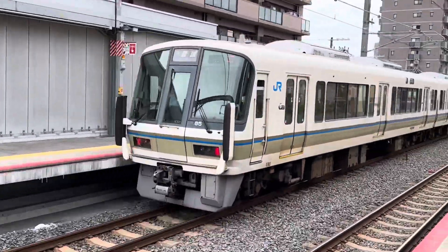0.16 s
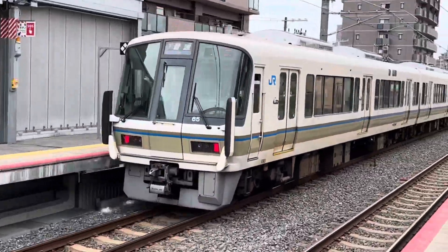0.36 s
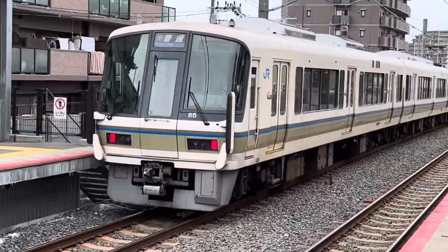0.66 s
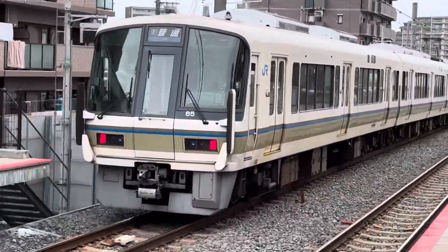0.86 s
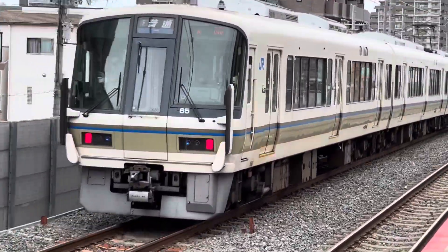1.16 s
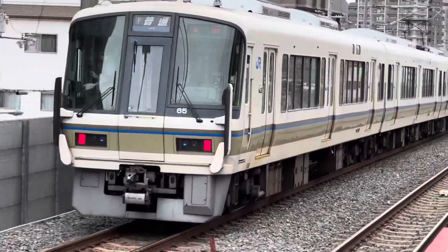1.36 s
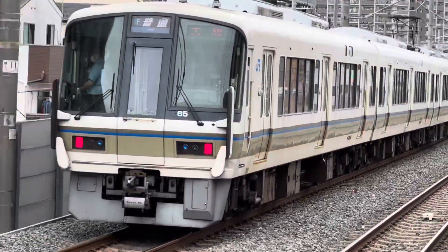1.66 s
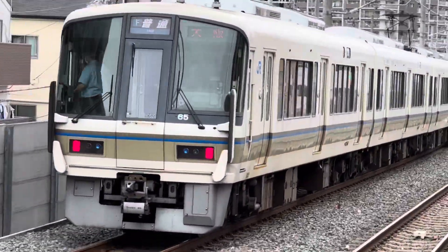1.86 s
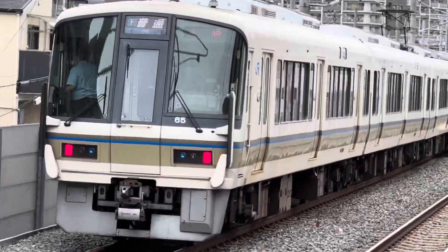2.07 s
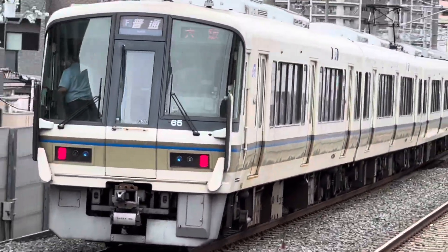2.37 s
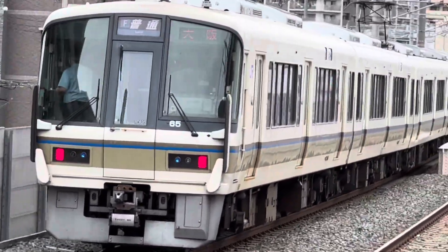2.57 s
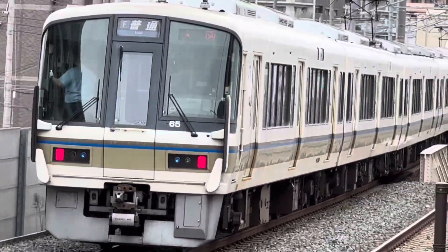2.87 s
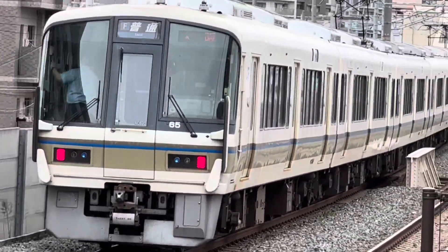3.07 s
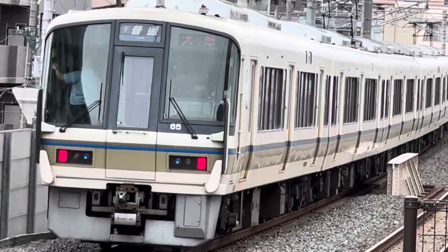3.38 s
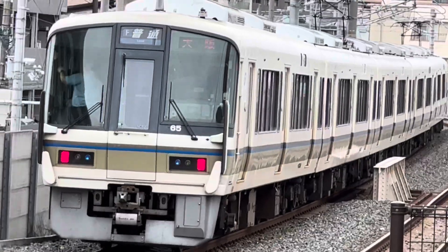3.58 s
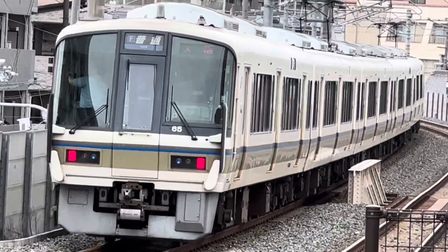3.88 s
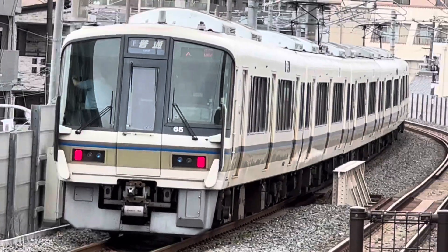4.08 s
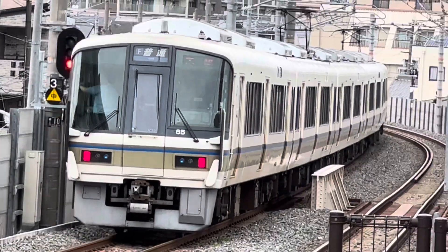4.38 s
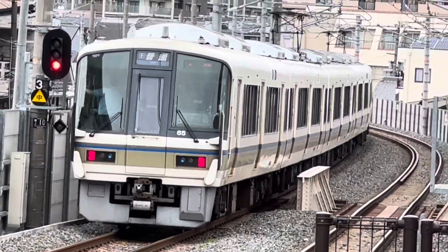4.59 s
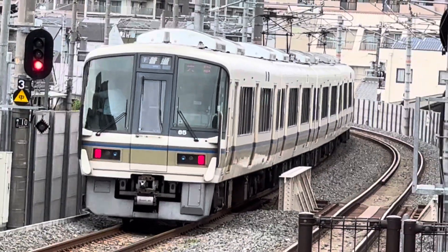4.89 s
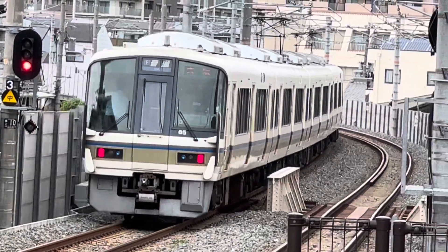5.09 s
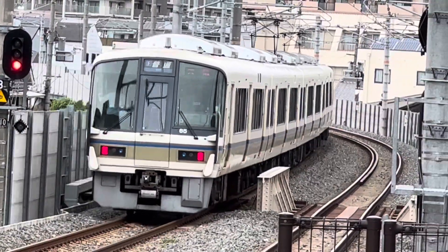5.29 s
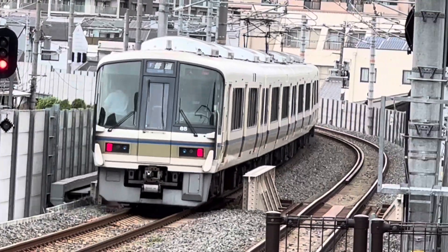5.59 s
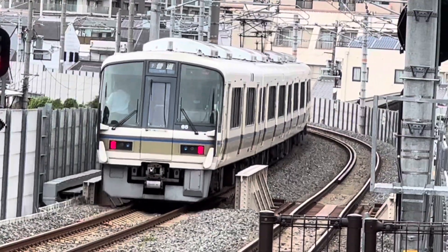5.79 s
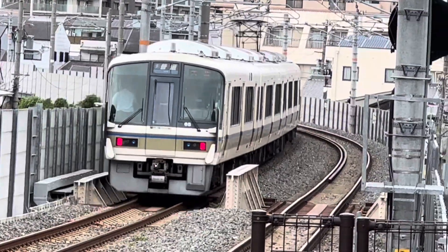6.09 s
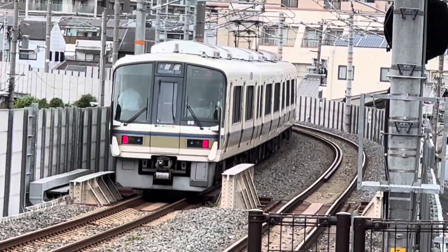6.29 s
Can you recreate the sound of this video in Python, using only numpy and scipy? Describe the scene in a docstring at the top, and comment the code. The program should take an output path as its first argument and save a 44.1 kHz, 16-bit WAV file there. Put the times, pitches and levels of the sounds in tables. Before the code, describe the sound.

Close steel rumble and a low motor whine recede along the track as gusts buffet the microphone, softly at first, harder near the end.

```python
"""From an open platform, a dozen metres off the last car, an electric train is heard gathering speed.
At first wheels squeal, eddies thump the two microphone ports and a motor car drones past the platform end.
A worn wheel throbs once a turn and the drive whines as the roar sinks into its echo off walls and houses.
Then the cars bite into a curve, swelling bands of that echo, while stronger gusts return to the microphone.
Shaped noise makes roar, echo and breeze; narrow noise the squeals; slowing swings the thumps."""
import sys
import numpy as np
from scipy import signal
from scipy.fft import rfft, irfft
from scipy.io import wavfile
from scipy.ndimage import uniform_filter1d

SR = 44100
rng = np.random.default_rng(int(sys.argv[2]) if len(sys.argv) > 2 else 0)


def file_out(sig):
    """Save sig as 16-bit WAV at sys.argv[1]."""
    # one column per channel
    cols = np.atleast_2d(sig).T
    # limit, then scale
    lim = np.clip(cols, -1, 1)
    pcm = np.round(lim * 32767).astype(np.int16)
    wavfile.write(sys.argv[1], SR, pcm)


N = 284445  # samples
SIZE, HOP = 1024, 256  # spectral frame and step, samples
BINS = np.fft.rfftfreq(SIZE, 1 / SR)  # Hz
FRAMES = np.arange(N // HOP + 3) * HOP / SR  # s
TIME = np.arange(N) / SR  # s
SIDES = np.array([[1], [-1]])  # left, right

# Microphone, left port against right: freq_hz, likeness (0 to 1)
PORT_LIKENESS = [(60, .89), (250, .89), (640, .64), (1050, .15), (1400, .52), (1750, .88), (2300, .965),
                 (2900, .91), (4000, .95), (5500, .985), (7700, .9999), (8800, .9999), (9600, .9),
                 (11000, .99), (13000, .95), (15000, .4)]
# Lead of the left port: freq_hz, lead_rad
PORT_LEAD = [(6700, 0), (7350, 1), (7700, 3.13), (8800, 3.15), (9150, 1.5), (10300, 0)]
# Left port minus right: freq_hz, balance_db
PORT_BALANCE = [(700, 0), (1000, 1), (1320, 3), (1900, .6), (2400, 0)]
TREBLE_EDGE_HZ = 15650

# Colour of the breeze's rumble, only the shape counts: freq_hz, density_db
BREEZE_COLOUR = [(25, -13), (48, 7), (66, 6), (100, -8), (135, -9.5), (190, -10), (280, -28.5), (600, -43),
                 (2000, -85)]
# Gusts at the microphone: middle_s, length_s, level_db (before the breeze's trim), pitch_factor
GUSTS_AT_PORTS = [(0.174, 1, -31, 0.99), (.47, 0.44, -32, 1.18), (2.763, 0.44, -35, 1.27),
                  (3.703, 1, -44.5, 0.99), (4.81, 0.27, -37, 1.1), (5.107, 0.28, -34, 1.11),
                  (5.402, 0.55, -31.5, 0.99), (5.684, 0.41, -33, 1.16), (5.922, 0.39, -32.5, 1.03),
                  (6.066, 0.2, -31, 1.1)]
# The breeze between gusts (before the trim), and its quick unevenness (rms dB)
LULL_DB, LULL_PITCH_FACTOR, LUMPY_DB = -58, 0.94, 1.8
# Single eddies striking the ports: middle_s, level_db, pitch_hz (at the middle), length_s,
# wake_db (against level_db)
PORT_EDDIES = [(0.113, -17.5, 98, 0.04, -9), (.152, -19, 149, 0.015, -3), (.181, -20, 113, 0.02, -6),
               (.246, -29, 190, 0.025, -19), (0.31, -21.5, 91, 0.041, -10), (0.41, -21.5, 129, 0.025, -14),
               (0.435, -21.5, 129, 0.033, -6), (0.522, -29, 67, .05, -10), (.612, -20, 108, 0.017, -9),
               (2.456, -15.5, 90, 0.017, -12.5), (2.79, -32, 84, 0.044, -14), (2.838, -26, 68.3, .04, -14),
               (2.878, -27, 78, 0.042, -17), (3.615, -31, 62, 0.049, -23), (3.863, -30, 62.3, 0.055, -15),
               (4.76, -28, 149, .018, -18), (4.83, -30.5, 86, .05, -14), (5.063, -25.5, 61.6, .04, -17),
               (5.275, -19, 81.5, .028, -20), (5.366, -26, 64, .045, -19), (5.42, -29, 170, 0.017, -14),
               (5.465, -27.5, 110, 0.022, -11), (5.495, -28, 57.5, 0.061, -16),
               (5.612, -24.5, 123, 0.028, -18), (5.631, -17, 165, 0.013, -19),
               (5.836, -12.5, 146, 0.022, -11), (6.031, -27.5, 207, 0.018, -3),
               (6.099, -24, 95, 0.018, -13), (6.123, -29, 56, 0.044, -20), (6.183, -27.5, 195, 0.014, -19)]
WAKE_PEAK_S = .028  # from the middle of an eddy to the height of its wake
# Brief faint hisses: middle_s, length_s, centre_hz, width_hz, level_db
TREBLE_HISSES = [(1.762, .006, 12800, 3000, -57), (3.425, .12, 4900, 3000, -55.5),
                 (4.882, 0.49, 3550, 1100, -59), (6.292, 0.036, 10500, 3500, -68),
                 (6.42, .25, 10500, 3000, -72)]

# Wheel speed, its gain each second, the part of a turn already done, and the rim's length
TURNS_PER_S, TURNS_PER_S2, FIRST_TURN, WHEEL_RIM_M = 4.48, .17, .45, 2.7
START_M = 12.2  # distance of the last car at the start
HUM_RECEDE_SHARE = .55  # share of the train's fading that the hum follows; echoes carry the rest
# Pitch of the drive's whine, before it wavers: time_s, pitch_hz
WHINE_PITCH_TRACK = [(.7, 384), (1.3, 393), (2.1, 401), (2.85, 370), (3.3, 374), (4.0, 392), (5.5, 394),
                     (6.4, 402)]
# The whine stands out of the hum: middle_s, length_s, peak_db
WHINE_STANDOUTS = [(0.677, 0.43, -31), (1.28, 0.38, -34), (1.732, 0.15, -36), (1.884, 0.21, -32.5),
                   (2.036, 0.26, -35.5), (2.543, 0.15, -42), (2.834, 0.19, -37), (3.94, .25, -46),
                   (4.247, 0.055, -38), (5.193, 0.19, -42), (5.515, 0.28, -39.5)]
# A wheel sings out briefly: middle_s, length_s, pitch_hz, width_hz, level_db (of the part common to both sides)
WHEEL_SONGS = [(0.016, .1, 650, 45, -34), (0.046, 0.09, 544, 160, -34), (0.154, 0.2, 650, 55.3, -33),
               (0.224, .13, 460, 30.2, -32), (0.317, .2, 723, 25, -38.5), (.07, .2, 1407, 60, -42.5),
               (0.173, .1, 1970, 90, -39), (1.063, .16, 336, 25, -41), (1.474, .12, 1380, 70, -46),
               (1.883, 0.08, 1370, 70, -44), (2.291, .12, 1380, 80, -50), (3.414, 0.1, 1430, 100, -47.5),
               (3.6, 0.11, 1420, 70, -50), (5.846, 0.094, 1390, 70, -47.5), (6.386, .2, 383, 80.6, -41.5)]

# Direct rolling roar, only the shape counts: freq_hz, density_db
ROAR_COLOUR = [(48, -12), (76, 14), (100, -4), (140, 4.5), (310, 2.5), (420, 2), (510, -2), (635, 1),
               (740, -2), (1050, -3), (1250, -13.5), (2400, -15.5), (4400, -26.5), (7000, -26.5),
               (9500, -29.5), (11000, -42.5), (15500, -50)]
# The roar thrown back by walls and houses, only the shape counts: freq_hz, density_db
ECHO_COLOUR = [(40, -1), (64, 4), (105, 3), (170, 3.5), (290, -7.5), (430, -1.5), (590, -5), (780, -2),
               (1150, -11), (1700, -20.5), (3000, -21), (5000, -48.5), (7400, -59), (9300, -37),
               (10800, -68), (12500, -42.5), (15500, -54)]
# Ringing of wheels and rails, about which it flickers: pitch_hz, width_hz, height_db
STEEL_RINGS = [(1412, 125, 7.5), (1520, 180, 1), (1928, 164, 5.5), (2056, 160, 4.5), (2690, 207, 8),
               (3634, 410, 5.5), (4410, 1050, 7)]
# How far each band joins in the throb: freq_hz, swing_factor
THROB_BANDS = [(60, 0.36), (350, 1.65), (900, 1.44), (1400, 0.91), (2200, 0.85), (5000, 0.64),
               (12000, 0.53)]
# Echo bands that swell: middle_s, length_s, rise_db, centre_hz, width_hz; the wide rows as cars bite into the
# curve, the narrow 212 Hz row a low hum that swells for a while
CURVE_BITES = [(2.3, 1.06, 4.5, 850, 700), (3.6, 1.2, 7, 212, 50), (6.54, 1.05, 6, 635, 650)]
# Throb swing before the band factors: open track, and extra as the worn wheel passes the platform end
THROB_DB, PLATFORM_END_DB = 3.5, 5.5
PLATFORM_END_S, PLATFORM_END_LENGTH_S = 0.78, 0.61
# Stereo width exponent: far away, and extra while close
FAR_WIDTH, NEAR_WIDTH = .5, 1.1
TREBLE_RISE_DB_PER_M = 0.03  # tilt of the direct roar at 7 kHz, per metre rolled


def amp(db):
    """Turns decibels into an amplitude factor."""
    return 10 ** (np.asarray(db) / 20)


def evened(x):
    """Scales to rms 1."""
    return x / np.sqrt(np.mean(x ** 2) + 1e-20)


def at(curve, s):
    """Reads a curve in time."""
    return np.interp(s, *np.transpose(curve))


def across(points, hz=BINS):
    """Reads a table on a log-frequency axis."""
    f, value = np.transpose(points)
    return np.interp(np.log(hz + 1), np.log(f), value)


def swell(s, middle_s, length_s):
    """A smooth rise and fall of height 1."""
    return np.cos(np.pi * np.clip((s - middle_s) / length_s, -.5, .5)) ** 2


def resonance(hz, width_hz):
    """Peak of height 1 over the bins, half as high at half its width from the centre."""
    return 1 / (1 + (2 * (BINS - hz) / width_hz) ** 2)


def add(mix, s, sound):
    """Mixes a sound in from time s, or from the very start if s is negative."""
    part = mix[:, max(round(s * SR), 0):][:, :sound.shape[-1]]
    part += sound[..., :part.shape[1]]


def patches(frames_count, bins_count):
    """Smooth chance over time and frequency, rms 1."""
    chance = rng.standard_normal((len(FRAMES), len(BINS)))
    chance = uniform_filter1d(chance, frames_count, axis=0)
    return evened(uniform_filter1d(chance, bins_count, axis=1))


def port_noise(colour_db, motion_db, width=1):
    """Coloured noise moved by a field of dB at the two ports; a wider source is less alike in them."""
    shape = (2, len(FRAMES), len(BINS))
    left, other = rng.standard_normal(shape) + 1j * rng.standard_normal(shape)
    same = np.clip(across(PORT_LIKENESS) ** width, 0, 1)
    right = same * left + np.sqrt(1 - same ** 2) * other
    right = right * np.exp(-1j * across(PORT_LEAD))
    lean = amp(across(PORT_BALANCE) / 2)
    spectra = np.array([left * lean, right / lean]) * evened(amp(colour_db)) * amp(motion_db)
    spectra = spectra.transpose(0, 2, 1) / np.sqrt(HOP)
    return signal.istft(spectra, nperseg=SIZE, noverlap=SIZE - HOP)[1][:, :N]


def band_noise(hz, width_hz, size):
    """Noise of rms 1 in a bell-shaped band."""
    f = np.fft.rfftfreq(size, 1 / SR)
    bell = np.exp(-2 * ((f - hz) / width_hz) ** 2)
    return evened(irfft(rfft(rng.standard_normal(size)) * bell, size))


def complex_noise(spread_hz):
    """Slow noise that blurs a turning tone in both phase and strength."""
    return band_noise(0, spread_hz, size=N) + 1j * band_noise(0, spread_hz, size=N)


def breeze(trim_db=-1, width=1.6):
    """Lumpy low rumble of air over the ports, partly their own at each; gusts rise out of a steady lull."""
    def colour(pitch_factor):
        """The rumble's spectrum shifted in pitch, rms 1."""
        return evened(amp(across(BREEZE_COLOUR, BINS / pitch_factor)))
    power = (amp(LULL_DB) * colour(LULL_PITCH_FACTOR)) ** 2
    for s, length, db, pitch_factor in GUSTS_AT_PORTS:
        gust = amp(db) * swell(FRAMES, s, length)[:, None] * colour(pitch_factor)
        power = power + gust ** 2
    motion_db = 10 * np.log10(power) + LUMPY_DB * patches(frames_count=5, bins_count=12)
    return amp(trim_db) * port_noise(0, motion_db, width)


def eddies(rise_share=0.59, fall_share=1.08, sag=0.62, skew_rad=0.28, wake_hz=58,
           edge_db=-9, edge_ratio=1.83, edge_share=0.69):
    """Each eddy shoves the diaphragms through slowing swings, skewed between ports, and leaves a low wake."""
    out = np.zeros((2, N))
    t = np.arange(-SR // 10, SR // 4) / SR
    first_sides = rng.choice([-1, 1], len(PORT_EDDIES))
    for (s, db, hz, length, wake_db), side in zip(PORT_EDDIES, first_sides):
        age = t / length
        shove = np.exp(-(2 * age / np.where(t < 0, rise_share, fall_share)) ** 2)
        phase = 2 * np.pi * hz * length * (1 - np.exp(-sag * np.clip(age, -2, 2))) / sag
        apart = side * skew_rad * SIDES
        # the hardest swing is steeper
        edge = np.exp(-(2 * age / edge_share) ** 2) * np.sin(edge_ratio * phase + apart)
        wake_age = np.maximum(t, 0) / WAKE_PEAK_S
        wake = wake_age * np.exp(1 - wake_age) * np.sin(2 * np.pi * wake_hz * t + apart)
        strike = shove * np.sin(phase + apart) + amp(edge_db) * edge + amp(wake_db) * wake
        add(out, s + t[0], amp(db) * strike)
    return out


def hisses():
    """Short soft swells of treble noise, the same at both ports."""
    out = np.zeros((2, N))
    for s, length, hz, width, db in TREBLE_HISSES:
        count = int(length * SR)
        add(out, s - length / 2, amp(db) * np.hanning(count) * band_noise(hz, width, size=count))
    return out


def wheel_turns(s):
    """Turns made since the start, under steady acceleration."""
    return TURNS_PER_S * s + TURNS_PER_S2 * s ** 2 / 2


def metres_rolled(s):
    """Each turn carries the train one rim's length."""
    return WHEEL_RIM_M * wheel_turns(s)


def receding_db(s):
    """Sound pressure falls as one over the distance, which grows as the wheels roll."""
    return -20 * np.log10(1 + metres_rolled(s) / START_M)


def treble_rise_db(s):
    """The direct roar tilts towards the treble as the wheels roll on."""
    return TREBLE_RISE_DB_PER_M * metres_rolled(s)[:, None] * (BINS / 7000) ** 1.5


def wheel_beat(s, rise=0.16, fall=0.75):
    """Once a turn the worn patch meets the rail: a quick swell that dies away; mean 0, swing 1."""
    turn = (FIRST_TURN + wheel_turns(s)) % 1
    beat = np.minimum(turn / rise, 1) * np.exp(-np.maximum(turn - rise, 0) / fall)
    return beat - beat.mean()


def boom(boom_db=-40.5, boom_hz=69, width_hz=19, recede_share=0.19, apart=0.11):
    """Car bodies and track bed boom under the rolling weight; so low a sound carries far."""
    mid, side = (band_noise(boom_hz, width_hz, size=N) for _ in range(2))
    return amp(boom_db + recede_share * receding_db(TIME)) * (mid + apart * side * SIDES)


def motor_hum(hum_db=-41.5, middle_s=1.16, length_s=3.4, spread_hz=14):
    """A motor car drones at a third of the whine's pitch while it passes the end of the platform."""
    turn = np.exp(2j * np.pi * np.cumsum(at(WHINE_PITCH_TRACK, TIME) / 3) / SR)
    return amp(hum_db) * swell(TIME, middle_s, length_s) * (turn * complex_noise(spread_hz)).real


def drive(blur_db=-39.5, spread_hz=62, waver_hz=4, apart=0.21, throb_db=3):
    """Motors out of step blur into a broad hum; the leading ones' wavering tone comes and goes in it."""
    waver = waver_hz * band_noise(0, 8.64, size=N)
    turn = np.exp(2j * np.pi * np.cumsum(at(WHINE_PITCH_TRACK, TIME) + waver) / SR)
    blur, side = (complex_noise(spread_hz) for _ in range(2))
    hum_db = blur_db + HUM_RECEDE_SHARE * receding_db(TIME) + throb_db * wheel_beat(TIME)
    hum = amp(hum_db) * (blur + apart * side * SIDES)
    tone = sum(amp(db) * swell(TIME, s, length) for s, length, db in WHINE_STANDOUTS)
    return (turn * (hum + tone)).real


def singing(apart=0.37):
    """Now and then a rubbing wheel lets one narrow resonance sing out."""
    out = np.zeros((2, N))
    for s, length, hz, width, db in WHEEL_SONGS:
        count = int(length * SR)
        mid, side = (band_noise(hz, width, size=count) for _ in range(2))
        add(out, s - length / 2, amp(db) * np.hanning(count) * (mid + apart * side * SIDES))
    return out


def steel_ring(wander=0.008, flicker=0.17):
    """Steel resonances in dB; pitch and strength drift as the contact point wanders over the tread."""
    total = 0
    for hz, width, db in STEEL_RINGS:
        chance = rng.standard_normal((2, len(FRAMES), 1))
        drift, strength = evened(uniform_filter1d(chance, size=9, axis=1))
        total = total + db * (1 + flicker * strength) * resonance(hz * (1 + wander * drift), width)
    return total


def rolling(roar_db=-28.0, echo_db=-40.0, roar_patchy_db=1.0, echo_patchy_db=0.8, echo_throb=0.13):
    """Rough steel on steel rings the wheels and rails; the direct roar recedes into its own echo."""
    ring_db = steel_ring()
    mean_ring_db = ring_db.mean(0)
    waver_db = ring_db - mean_ring_db
    swing_db = THROB_DB + PLATFORM_END_DB * swell(FRAMES, PLATFORM_END_S, PLATFORM_END_LENGTH_S)
    throb_db = (wheel_beat(FRAMES) * swing_db)[:, None] * across(THROB_BANDS)
    fading_db = receding_db(FRAMES)[:, None]
    near_db = fading_db + treble_rise_db(FRAMES) + throb_db
    near_db = near_db + roar_patchy_db * patches(frames_count=12, bins_count=8)
    # many paths soften the throb in the echo
    far_db = echo_throb * throb_db + echo_patchy_db * patches(frames_count=24, bins_count=5)
    curve_db = sum(db * swell(FRAMES, s, length)[:, None] * resonance(hz, width)
                   for s, length, db, hz, width in CURVE_BITES)
    stereo_width = FAR_WIDTH + NEAR_WIDTH * amp(fading_db)
    roar = port_noise(across(ROAR_COLOUR) + mean_ring_db, near_db + waver_db, stereo_width)
    echo = port_noise(across(ECHO_COLOUR) + mean_ring_db, far_db + curve_db + waver_db, stereo_width)
    return amp(roar_db) * roar + amp(echo_db) * echo


def scene():
    """Wind at the microphone and the train drawing away from it."""
    wind = breeze() + eddies() + hisses()
    train = boom() + motor_hum() + drive() + singing() + rolling()
    return wind + train


def record(dry, low_cut_hz=41):
    """The recorder cuts the deepest bass and the top of the treble."""
    low_cut = signal.butter(4, low_cut_hz, "highpass", fs=SR, output="sos")
    treble_cut = signal.firwin(511, TREBLE_EDGE_HZ, window=("kaiser", 9), fs=SR)
    return signal.oaconvolve(signal.sosfilt(low_cut, dry), treble_cut[None], "same")


dry = scene()
out = record(dry)
file_out(out)
```